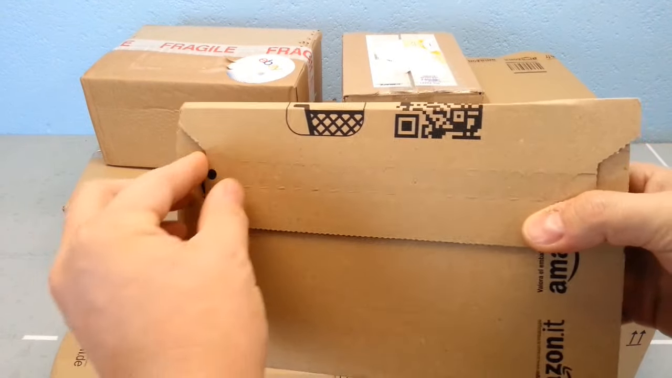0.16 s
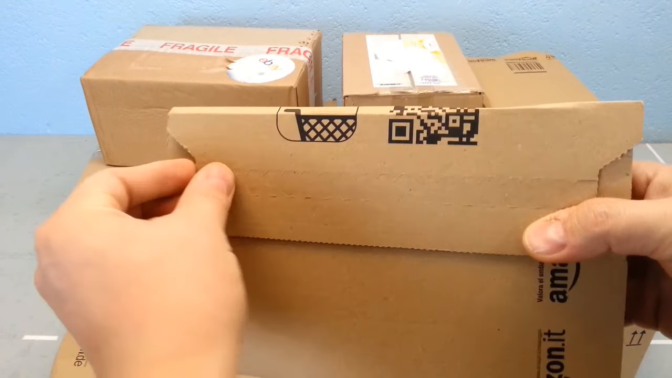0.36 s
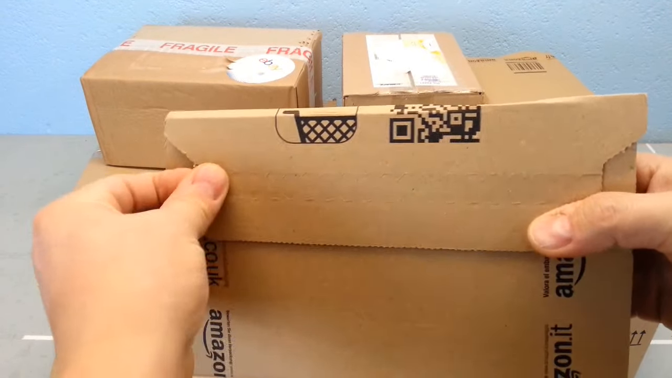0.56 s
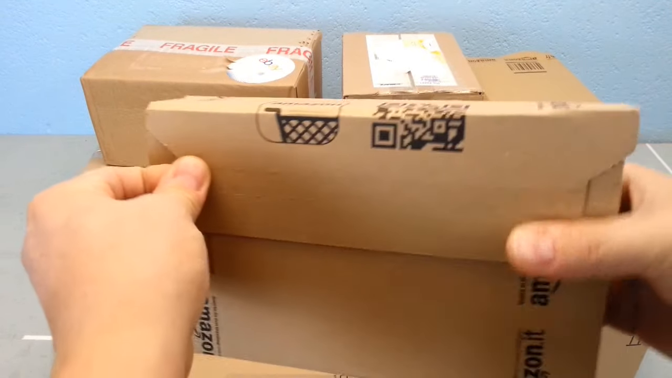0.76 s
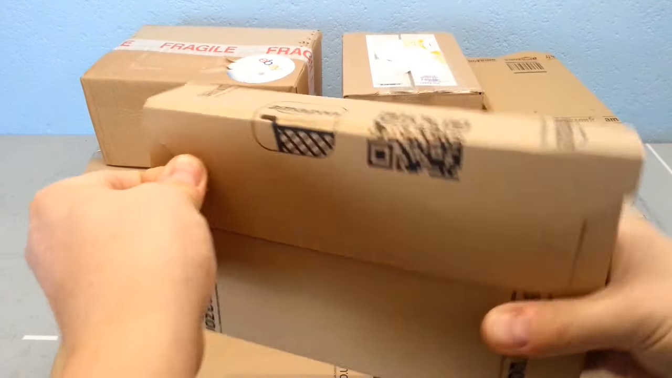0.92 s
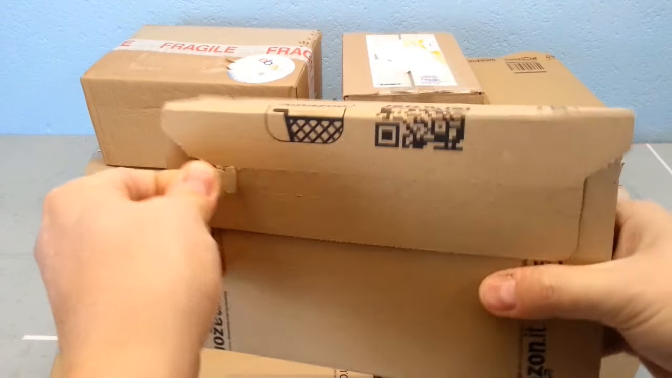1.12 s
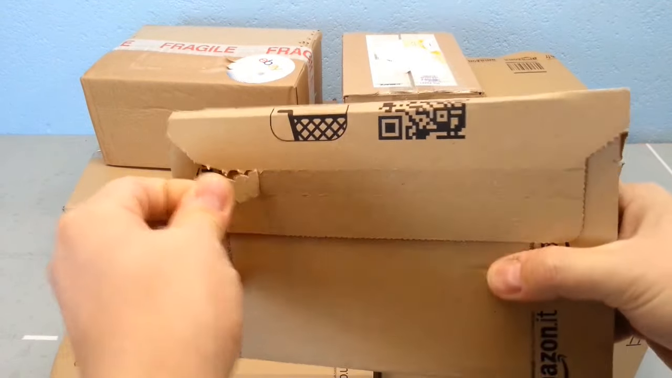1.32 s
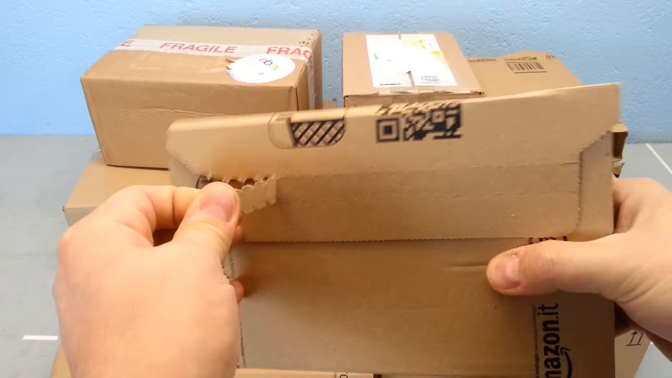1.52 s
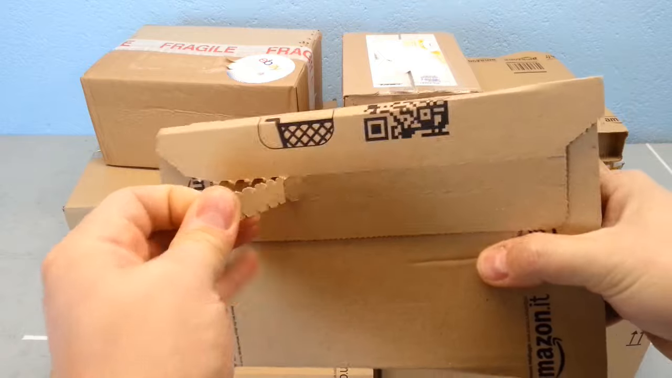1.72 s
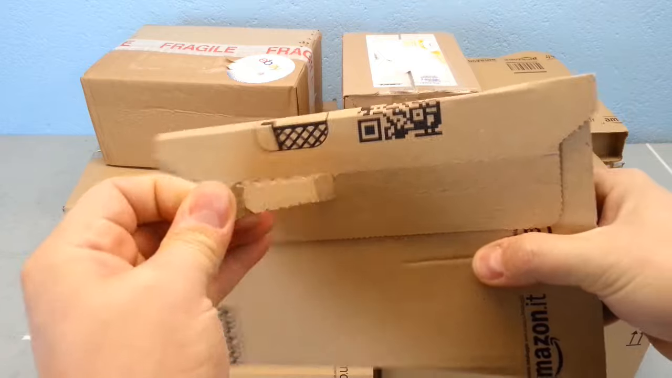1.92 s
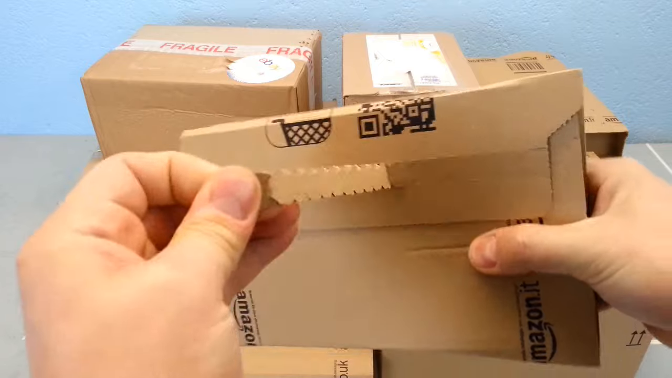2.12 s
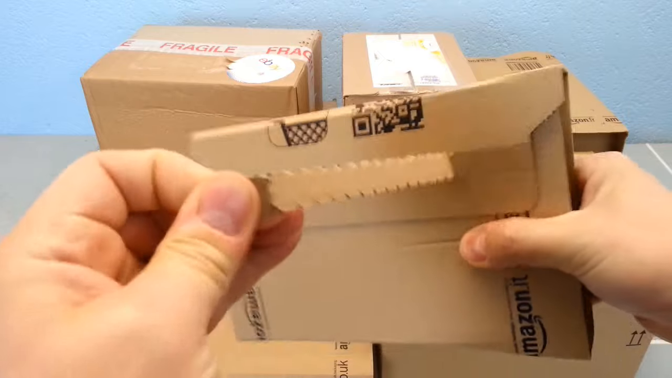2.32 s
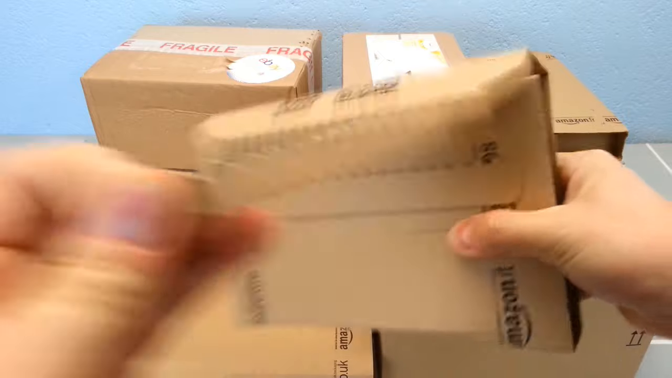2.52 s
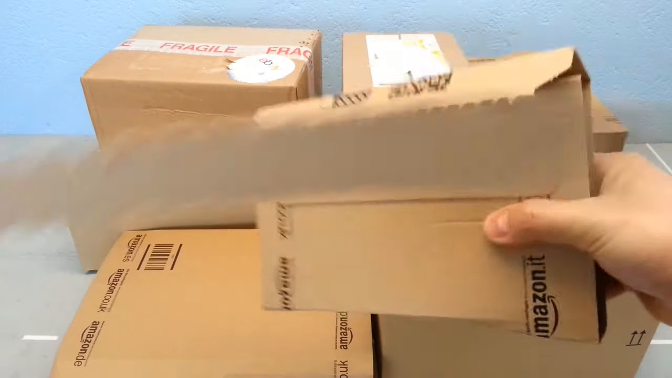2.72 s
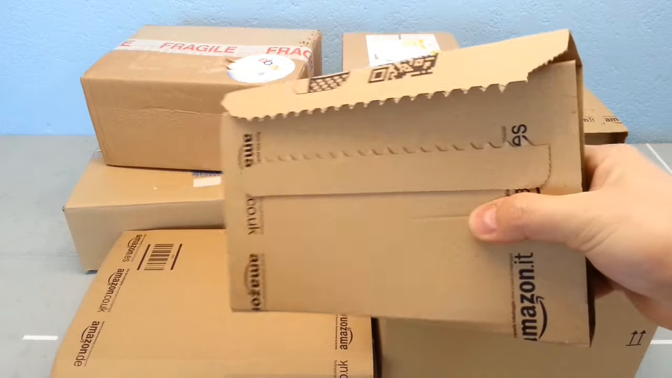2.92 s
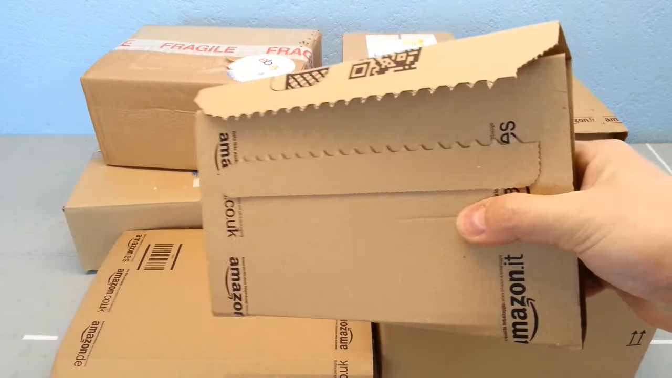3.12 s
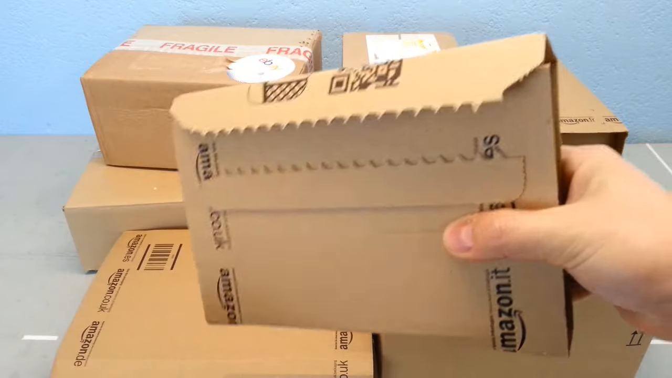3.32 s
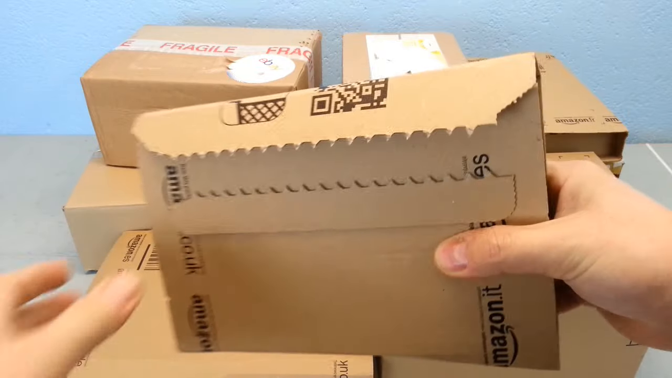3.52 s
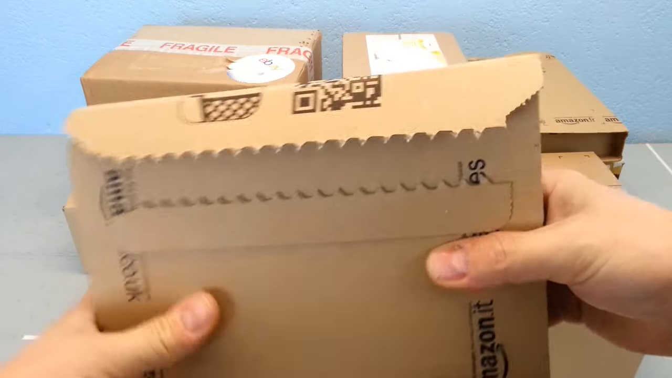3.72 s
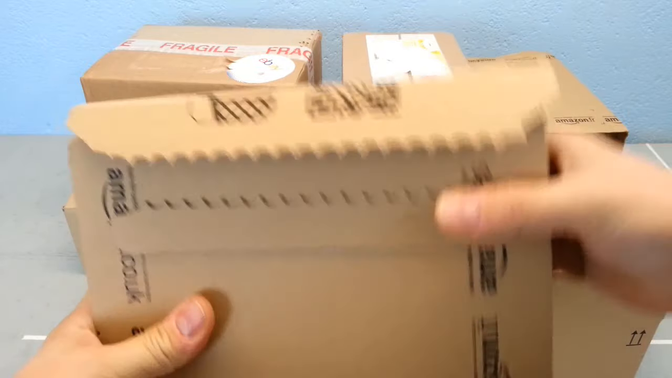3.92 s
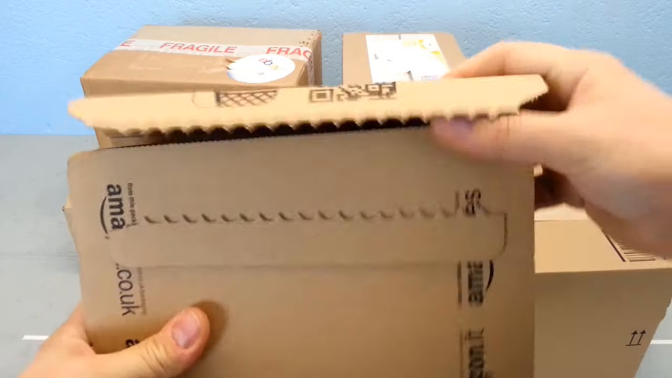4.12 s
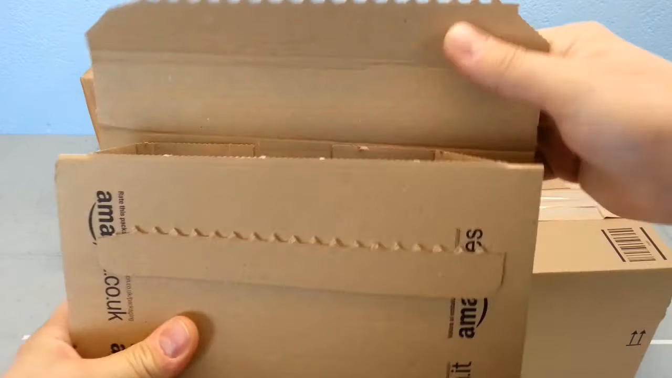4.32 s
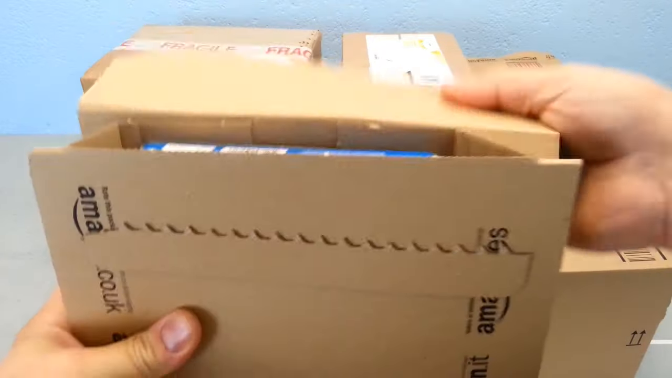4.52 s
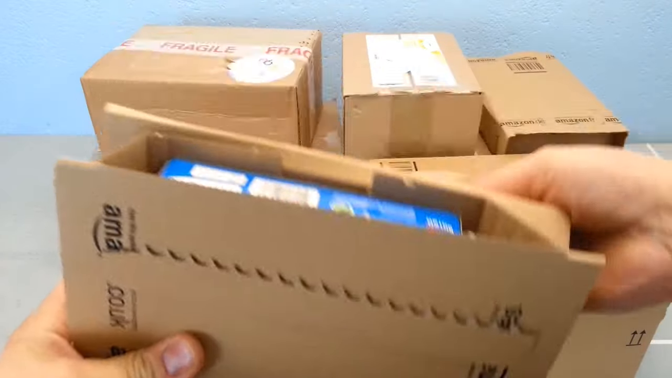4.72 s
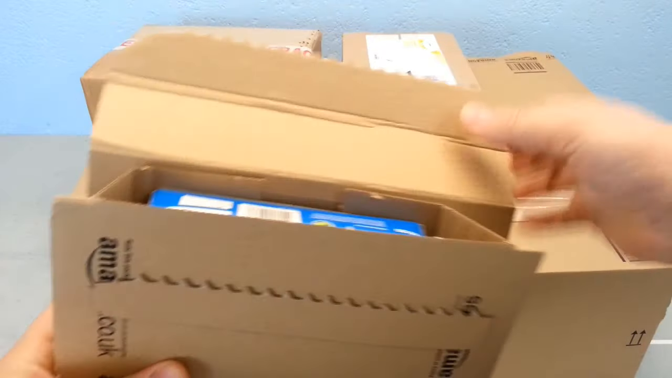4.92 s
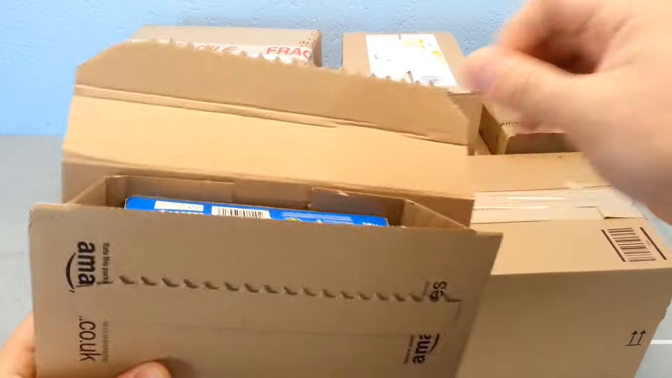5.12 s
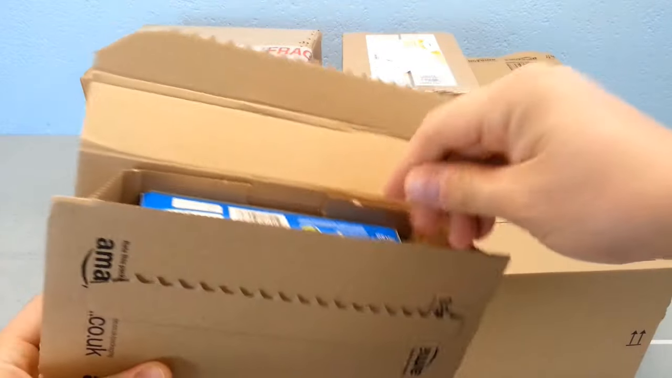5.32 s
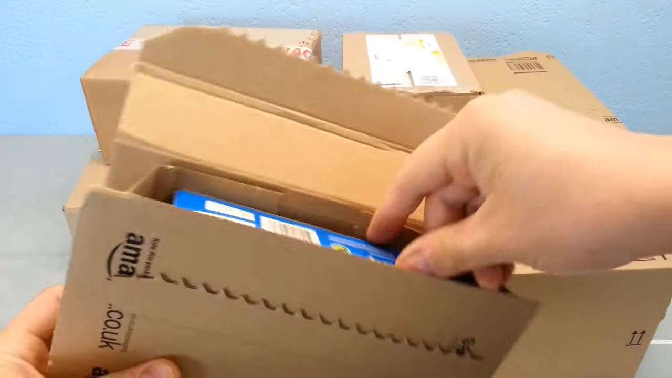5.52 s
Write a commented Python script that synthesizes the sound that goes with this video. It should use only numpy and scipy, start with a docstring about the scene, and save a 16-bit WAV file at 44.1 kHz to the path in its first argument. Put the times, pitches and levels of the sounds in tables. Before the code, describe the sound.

Fingers slide on a cardboard mailer and tug at its perforated strip. A few separate, sharp snaps quicken into a crackling rip, with hollow knocks from the harder pulls. After a brief lull, the flap is folded open with quieter creaks, light taps and rubbing. The microphone is close, in a small room with a short tail and soft hiss.

```python
"""A crackling rip in short tugs: a perforated strip is torn off a cardboard mailer in a small room.
Each paper tab snaps as a burst of fibre clicks that rings the board, and hard tugs knock the hollow
mailer. Then the flap is folded open: the board creaks and taps, and fingers slide over it.
A close two-port microphone hears it all, with a short room tail and soft hiss underneath."""
import sys
import numpy as np
from scipy import signal
from scipy.fft import rfft, irfft, next_fast_len
from scipy.io import wavfile
from scipy.ndimage import uniform_filter1d

SR = 44100
rng = np.random.default_rng(int(sys.argv[2]) if len(sys.argv) > 2 else 0)


def master_out(mix):
    """Clip the mix to full scale and print it as 16-bit PCM to the path in sys.argv[1]."""
    frames = np.transpose(np.atleast_2d(mix))
    ceiling = np.clip(frames, -1, 1)
    pcm = np.round(ceiling * 32767).astype(np.int16)
    wavfile.write(sys.argv[1], SR, pcm)


N = 245319

# fibres straining and skin sliding on the board: t/s, level/dB, treble lift/dB
FRICTION = [(0, -73.5, 10), (.43, -58, -4), (.47, -43.5, -8), (.56, -36.5, -21), (.62, -47, 5),
            (.98, -40.5, -6), (1.5, -41.5, 2), (1.81, -42.5, 3.5), (1.902, -24, 7.5), (1.97, -45.5, -18),
            (2.07, -28.5, 8.5), (2.35, -46.5, 9), (2.75, -39.5, -1), (2.901, -79.5, 6), (3.251, -64, 0.5),
            (3.4, -49, -10.5), (3.86, -61.5, -5.5), (3.88, -46, 0), (4.05, -41, 3), (4.37, -48.5, 2.5),
            (4.551, -56, -11), (4.58, -41.5, -5), (4.8, -38.5, 4), (5.001, -47, 1.5), (5.06, -58, -1),
            (5.25, -59.5, -0.5), (5.4, -50, -0.5), (5.56, -53, 1)]


def tab_snaps():
    """Paper tabs break along the perforation, each with a hard, bright crack."""
    # t/s, level/dB, treble lift/dB, ring f/Hz, fade/ms
    snaps = [(.597, -15, 3, 986, 2.2), (.642, -6.5, -5.5, 1500, 2.83), (.923, -21.5, 4, 960, 8.5),
             (.95, -19, 2, 950, 7.2), (.962, -18, -0.5, 1800, 8.4), (1.03, -26.5, -10, 1265, 4.1),
             (1.054, -23, -2, 1980, 5.6), (1.071, -28, 1.5, 1918, 11), (1.209, -17.5, 0, 780, 4.6),
             (1.222, -19.5, 7, 838, 11.5), (1.235, -17.5, 1.5, 1715, 10), (1.252, -3.5, -1.5, 782, 4.55),
             (1.428, -13.5, -3, 670, 3.5), (1.441, -6, 1, 1886, 6.3), (1.57, -16, 1.5, 1970, 14),
             (1.654, -25.5, -15, 494, 11), (1.714, -29.5, 0.5, 2935, 10), (1.796, -35.5, 9, 550, 1.2),
             (1.834, -11, -1.5, 2130, 14.8), (1.871, -15.5, -6, 1945, 7), (1.893, -15.5, -7.5, 1950, 19.7),
             (1.994, -28, -2, 502, 9), (2.008, -27, 7.5, 732, 3.4), (2.043, -26.5, 5, 705, 1.7),
             (2.057, -9, -1, 1452, 8.2), (2.084, -14, 0, 927, 11), (2.1, -10, -1, 1584, 11.6),
             (2.148, -31, -8.5, 1580, 3.7), (2.162, -13, -0.5, 1567, 10.7), (2.209, -18.5, -3.5, 920, 8.4),
             (2.229, -7.5, 0, 1520, 7.6), (2.274, -15, -16, 892, 6.8), (2.386, -11, 2.5, 1915, 10.6),
             (2.407, -8, 0, 1920, 12), (2.429, -15.5, -3.5, 1520, 5.4), (2.439, -15, 4, 1530, 22),
             (2.459, -13, 4, 2185, 7.6), (2.591, -2, -4.5, 1630, 5.6), (2.62, -16, 8, 1520, 31),
             (2.641, -6, -14.5, 1580, 5.2), (2.66, -29.5, 17.5, 1178, 4.4), (2.672, -9.5, -9.5, 1530, 8.3),
             (2.696, -13.5, -26.5, 670, 5.6), (2.721, -23.5, -25.5, 1390, 14)]
    return bursts(snaps, bass_db=-13, rise_share=.39, scatter_db=3, crack_db=14,
                  ring_db=6.5, ring_share=.036)


def board_creaks():
    """The handled board creaks: slower swells of clicks with a soft attack."""
    # t/s, level/dB, treble lift/dB, ring f/Hz, fade/ms
    creaks = [(.468, -28, -9, 1010, 7.4), (.486, -26.5, -16.5, 580, 15.3), (.788, -39, 0, 1130, 6.7),
              (.824, -30, -2, 880, 15), (1.556, -26.5, 1, 930, 14), (3.29, -44.5, -12, 1936, 14),
              (3.366, -39.5, -2, 940, 18), (3.59, -52, -10, 1890, 13), (3.888, -33.5, -24, 960, 16),
              (3.943, -30, -14, 540, 5.7), (3.987, -26.5, -15, 786, 9.7), (4.006, -30, -8, 1090, 16),
              (4.134, -27.5, -4, 1070, 8.6), (4.364, -36, 1.5, 1170, 26), (4.461, -42, 6, 870, 29),
              (4.525, -40, -12, 1290, 6.9), (4.621, -28, -29, 1420, 4.3), (4.698, -32.5, 11, 1730, 25),
              (4.876, -30, -6, 1160, 27), (4.975, -42.5, 9, 2000, 34), (5.083, -49, -23, 2330, 5.3),
              (5.5, -47, -4, 527, 8.3)]
    return bursts(creaks, bass_db=-13, rise_share=.52, scatter_db=2.5, crack_db=-3,
                  ring_db=7.5, ring_share=.067)


def board_taps():
    """Sudden taps of the handled board, grainy and with a strong ring; the sharp bright event near 0.64 s is a
    small tab snap of the tear, kept here."""
    # t/s, level/dB, treble lift/dB, ring f/Hz, fade/ms
    taps = [(.18, -38.5, -18, 1120, 5.5), (.447, -36.5, -23, 506, 4.7), (.621, -33, 9.5, 3460, 0.98),
            (.637, -28, 12, 3500, 1.1), (3.453, -36.5, 10, 2890, 19.6), (3.869, -34, -6, 930, 6.5),
            (4.252, -18, -5, 1400, 9), (4.287, -29, -8, 1080, 4.4), (4.569, -31, -4, 675, 10.5),
            (4.892, -24.5, -22, 1190, 10), (5.377, -38.5, 1, 1320, 6.7), (5.426, -38.5, 2, 2000, 14),
            (5.531, -37.5, -4.5, 2170, 3.1)]
    return bursts(taps, bass_db=-8.5, rise_share=.19, scatter_db=5, crack_db=3.5,
                  ring_db=11.5, ring_share=.072)


def bursts(events, bass_db, rise_share, scatter_db, crack_db, ring_db, ring_share, size=4096):
    """Clicks swell, crack at the peak and fade; the spot that gives way favours one ring of the board."""
    out = np.zeros((2, N + 2 * size))
    hz, body = board(size)
    lead = size // 4
    ms = (np.arange(size) - lead) * 1000 / SR
    bright = hz ** 2 / (hz ** 2 + 2500 ** 2)
    crack_envelope = (ms >= 0) * np.exp(-np.abs(ms) / 1.2)
    for s, db, treble_db, ring_hz, fade_ms in events:
        rise_ms = rise_share * fade_ms
        envelope = swell(ms, rise_ms, fade_ms)
        ring = 1 + undb(ring_db) / (1 + 1j * (hz - ring_hz) / (ring_share * ring_hz))
        tilt = undb(on_log([(350, bass_db), (700, .0087), (2800, .0053), (5000, treble_db)], hz))
        # the quicker the build-up, the harder the crack
        crack = undb(crack_db) / max(rise_ms, .5) * bright * rfft(crack_envelope * fibres(size, 2.63))
        spectra = (stereo_clicks(envelope, scatter_db, hz) + crack) * body * ring
        gain = undb(db) * np.linalg.norm(envelope) / midrange_level(spectra, hz, size)
        at = int(s * SR) - lead + size
        out[:, at:at + size] += irfft(gain * tilt * spectra, size)
    return out[:, size:size + N]


def fibres(size, scatter_db, biggest_db=15):
    """Dense clicks of breaking fibres: most are tiny, a few stand out."""
    return rng.standard_normal(size) * undb(np.minimum(scatter_db * rng.exponential(size=size), biggest_db))


def stereo_clicks(envelope, scatter_db, hz):
    """Left and right spectra of a wide tear: some clicks are shared, others arrive with opposite sign."""
    # side against mid: f/Hz, level/dB
    width = [(300, -12), (1000, -8), (2500, -4), (10000, 0)]
    mid, side = (rfft(envelope * fibres(len(envelope), scatter_db)) for _ in range(2))
    return mid + undb(on_log(width, hz)) * side * np.array([[1], [-1]])


def board(size):
    """Frequency response of the cardboard: a broad tone with ringing modes on top."""
    # broad tone: f/Hz, level/dB
    tone = [(30, -48.5), (120, -7), (220, -5), (320, -3), (1500, -3.5), (3000, -4), (6000, -13),
            (15000, -22.5)]
    # resonances: f/Hz, width/Hz, level/dB over the broad tone
    modes = [(330, 84, 11), (499, 52, 0.5), (731, 263, 2), (927, 53, -5.5), (1212, 92, 0), (1516, 230, 0),
             (1865, 41, 2), (2406, 180, -7), (3650, 670, -3), (4525, 820, -2)]
    hz = np.arange(size // 2 + 1) * SR / size
    rings = sum(undb(db) * resonance(hz, centre, width) for centre, width, db in modes)
    return hz, undb(on_log(tone, hz)) * (1 + rings)


def mailer_knocks(size=4096):
    """A tug or a finger thumps the hollow mailer; the soft push reaches only its lowest rings."""
    # t/s, level/dB
    knocks = [(0.448, -38), (.824, -27), (.962, -44.5), (1.14, -41.5), (1.252, -16.5), (1.44, -16),
              (1.568, -12), (1.654, -38), (1.836, -25), (1.871, -26), (1.9, -27), (1.999, -26),
              (2.058, -14.5), (2.085, -12.5), (2.104, -22.5), (2.163, -27.5), (2.23, -26.5), (2.276, -25.5),
              (2.392, -19.5), (2.46, -25.5), (2.593, -25), (2.642, -25), (2.681, -25), (3.886, -37.5),
              (4.007, -28.5), (4.569, -23.5), (4.622, -34), (5.426, -38)]
    out = np.zeros(N + 2 * size)
    hz, body = board(size)
    lead = size // 4
    envelope = swell((np.arange(size) - lead) * 1000 / SR, rise_ms=1, fade_ms=9.1)
    hollow = resonance(hz, centre_hz=260, width_hz=420) ** 2
    for s, db in knocks:
        thump = irfft(rfft(envelope * rng.standard_normal(size)) * body * hollow, size)
        at = int(s * SR) - lead + size
        out[at:at + size] += undb(db) * thump * np.linalg.norm(envelope) / np.linalg.norm(thump)
    return out[size:size + N]


def rubbing():
    """A patter of small fibre clicks through the board, fluttering as the grip slips."""
    size = 2 * next_fast_len(N // 2 + 1, True)
    hz, body = board(size)
    s, db, treble_db = np.transpose(FRICTION)
    now = np.arange(size) / SR
    slip_db = 2 * uniform_filter1d(np.repeat(rng.standard_normal(size // 200 + 1), 200), 200)[:size]
    spectra = stereo_clicks(undb(slip_db), 3.36, hz) * body
    spectra *= np.sqrt(size) / midrange_level(spectra, hz, size)
    bass = 1 / (1 + (hz / 550) ** 4)
    treble = 1 / (1 + (3500 / (hz + 1)) ** 4)
    out = 0
    for band, lift_db in ((bass, -4.5), (1 - bass - treble, 0), (treble, treble_db)):
        out += irfft(spectra * band, size) * undb(np.interp(now, s, db + lift_db))
    return out[:, :N]


def fibre_ticks(per_second=45, lift_db=7.5, scatter_db=3, fade_ms=.6):
    """Lone fibres let go under strain: tiny bright ticks, each nearer one port."""
    s, db, _ = np.transpose(FRICTION)
    chance, smallness, pan = rng.random((3, N))
    level_db = np.interp(np.arange(N) / SR, s, db) + lift_db - scatter_db * np.log(smallness + .02)
    triggers = (chance < per_second / SR) * undb(level_db)
    decay = np.exp(-1000 / (SR * fade_ms))
    envelope = signal.lfilter([1], [1, -decay], triggers * np.array([pan, 1 - pan]))
    ticks = envelope * rng.standard_normal(N)
    return signal.sosfilt(signal.butter(2, 4000, "high", fs=SR, output="sos"), ticks)


def room(dry, hop=8192):
    """The mailer keeps moving, so the room answers a little differently every moment."""
    mono = np.pad(dry.mean(axis=0), (hop, 2 * hop))
    wet = np.zeros((2, N + 3 * hop + SR))
    for at in range(0, N + hop, hop):
        grain = mono[at:at + 2 * hop] * signal.windows.hann(2 * hop, False)
        answer = signal.fftconvolve(grain[None], reflections(), axes=1)
        wet[:, at:at + answer.shape[1]] += answer
    return wet[:, hop:hop + N]


def reflections(size=16384, early_db=-2.5, early_fade_ms=6.6, tail_db=-5.5):
    """One answer of the room: close reflections off hands and boxes, then the tail from the walls."""
    # reverb time: f/Hz, T60/s
    decay_times = [(150, 0.37), (1000, .33), (4000, 0.29), (12000, 0.36)]
    s = np.arange(size) / SR
    hz = np.arange(size // 2 + 1) * SR / size
    tail = 0
    for centre in 125 * 2. ** np.arange(8):
        mid, side = rng.standard_normal((2, size))
        width = min(centre / 2500 + .14, 1)  # bass is alike at both ports
        noise = mid + width * side * np.array([[1], [-1]])
        octave = np.maximum(1 - np.abs(np.log2((hz + 1) / centre)), 0)
        tail += irfft(rfft(noise) * octave) * undb(-60 * s / on_log(decay_times, centre))
    tail *= 1 - np.exp(-s / .0046)
    early = np.diff(rng.standard_normal((2, size + 1))) * np.exp(-s * 1000 / early_fade_ms)
    return sum(undb(db) * part / np.linalg.norm(part, axis=1, keepdims=True)
               for part, db in ((tail, tail_db), (early, early_db)))


def hiss(level_db=-56):
    """Microphone hiss and faint room rumble, unrelated left and right."""
    # noise colour: f/Hz, relative level/dB
    colour = [(15, -65), (25, -25), (43, -28.5), (101, -13), (220, -11.5), (2900, -29.5), (5680, -34.5),
              (13400, -29.5), (15400, -47)]
    hz = np.arange(N // 2 + 1) * SR / N
    noise = irfft(rfft(rng.standard_normal((2, N))) * undb(on_log(colour, hz)), N)
    return noise * undb(level_db) / np.std(noise)


def swell(ms, rise_ms, fade_ms):
    """An envelope that builds to its peak at 0 ms, then fades."""
    return np.exp(np.where(ms < 0, ms / max(rise_ms, .1), -ms / max(fade_ms, .3)))


def resonance(hz, centre_hz, width_hz):
    """Band-pass response of one damped mode."""
    return 1j * hz * width_hz / (centre_hz ** 2 - hz ** 2 + 1j * hz * width_hz)


def midrange_level(spectra, hz, size):
    """Root of the mono energy between 600 and 3000 Hz."""
    midrange = spectra.mean(axis=0)[(hz > 600) & (hz < 3000)]
    return np.sqrt(2 * np.sum(np.abs(midrange) ** 2) / size)


def on_log(table, hz):
    """Reads a table of f/Hz, value on a log-frequency axis."""
    at, value = np.transpose(table)
    return np.interp(np.log(np.maximum(hz, 1)), np.log(at), value)


def undb(db):
    """Decibels to amplitude."""
    return 10 ** (np.asarray(db) / 20)


def scene():
    """The close cardboard drifts from right to left over the room tail and hiss."""
    # how much later the left port hears the mailer: t/s, delay/samples
    left_delay = [(0, 7.5), (1.5, 5), (2.099, 3), (2.7, 1), (5.56, -4)]
    direct = tab_snaps() + board_creaks() + board_taps() + mailer_knocks() + rubbing() + fibre_ticks()
    wet = room(direct)
    lag = np.round(np.interp(np.arange(N) / SR, *np.transpose(left_delay))).astype(int)
    direct[0] = direct[0, np.clip(np.arange(N) - lag, 0, N - 1)]
    return direct + wet + hiss()


def record(dry):
    """Each port has its own colour; peaks clip near full scale; the deepest bass and the top are cut."""
    # left over right: f/Hz, level/dB
    balance = [(60, -4), (110, 1), (200, -1), (380, 0), (700, -2), (1280, -1.5), (2370, 0.5), (4370, 1),
               (8070, -6), (14900, 0)]
    tilt_db = on_log(balance, np.arange(N // 2 + 1) * SR / N) / 2
    coloured = irfft(rfft(dry) * undb([tilt_db, -tilt_db]), N)
    clipped = np.clip(coloured, -.97, .97)
    low_cut = signal.sosfilt(signal.butter(1, 25, "high", fs=SR, output="sos"), clipped)
    return signal.sosfilt(signal.ellip(8, .2, 60, 14900, fs=SR, output="sos"), low_cut)


dry = scene()
out = record(dry)
master_out(out)
```